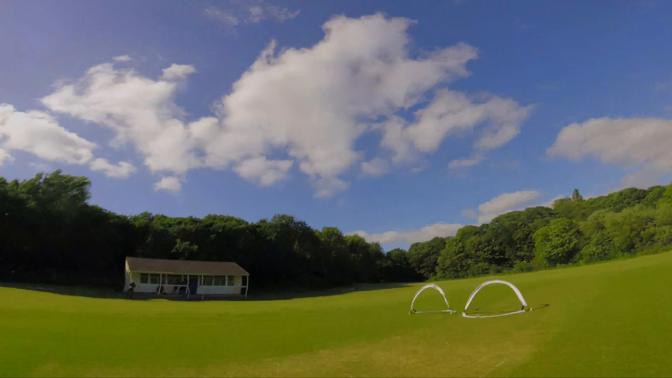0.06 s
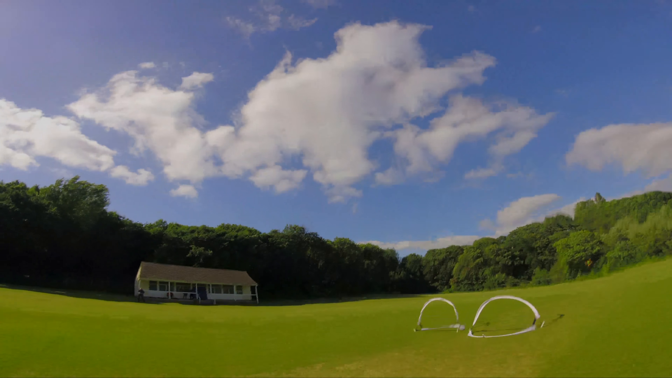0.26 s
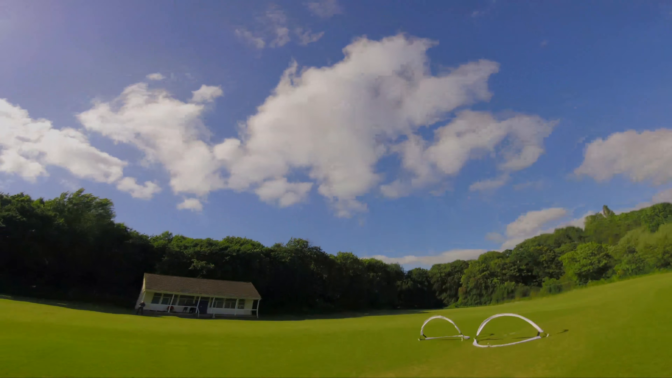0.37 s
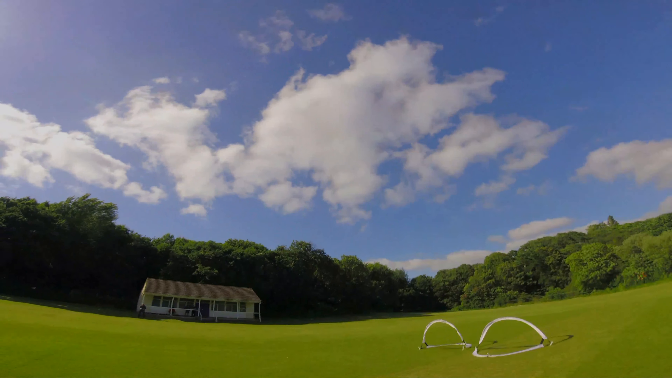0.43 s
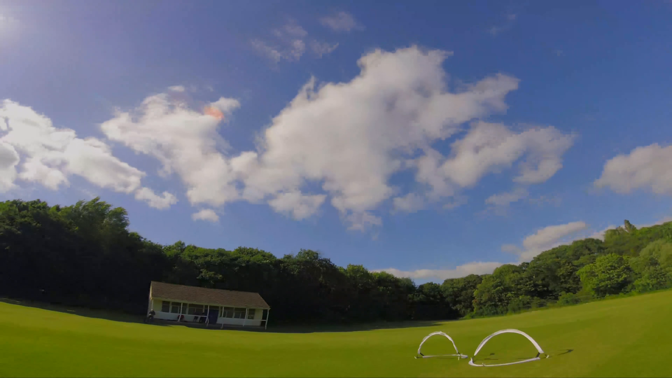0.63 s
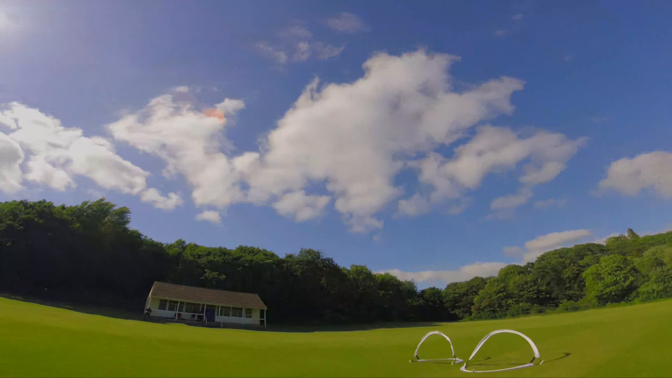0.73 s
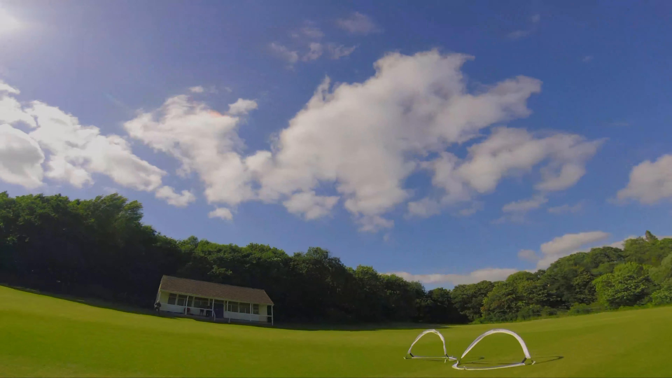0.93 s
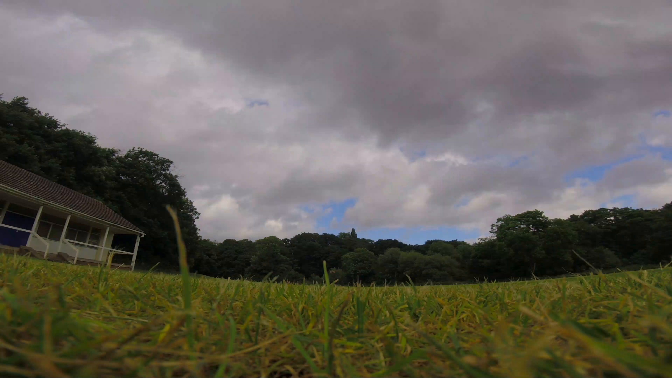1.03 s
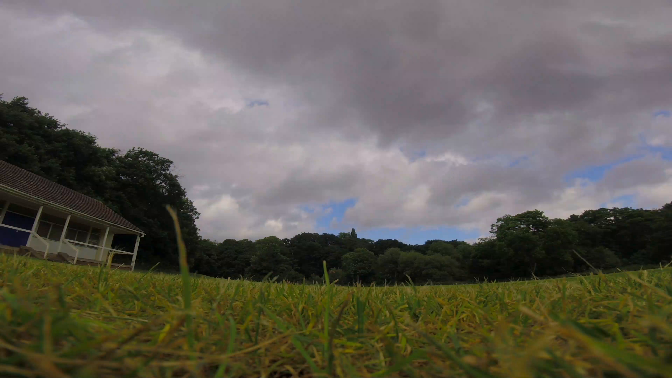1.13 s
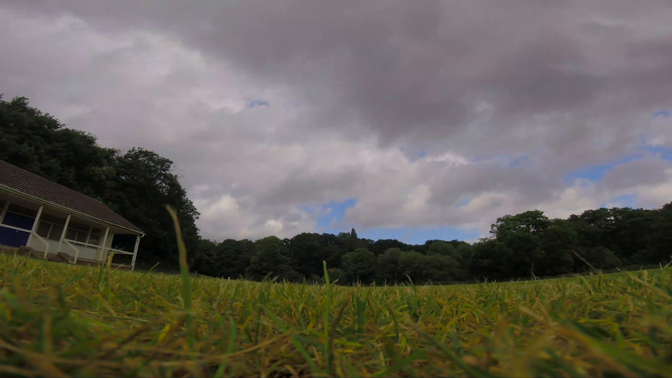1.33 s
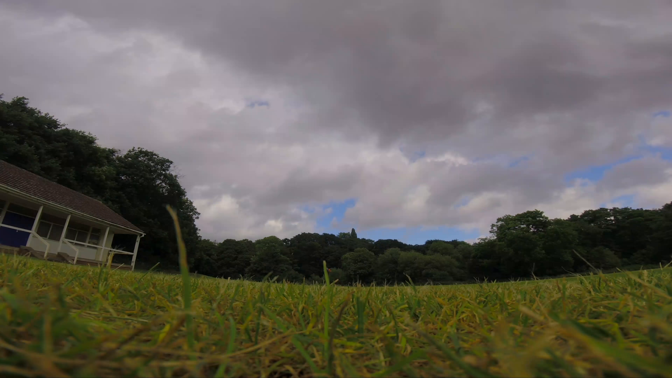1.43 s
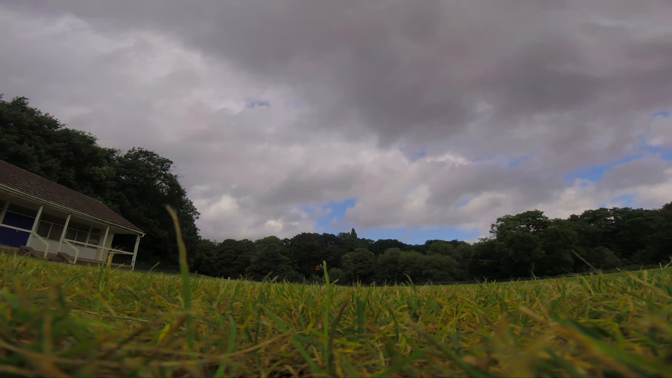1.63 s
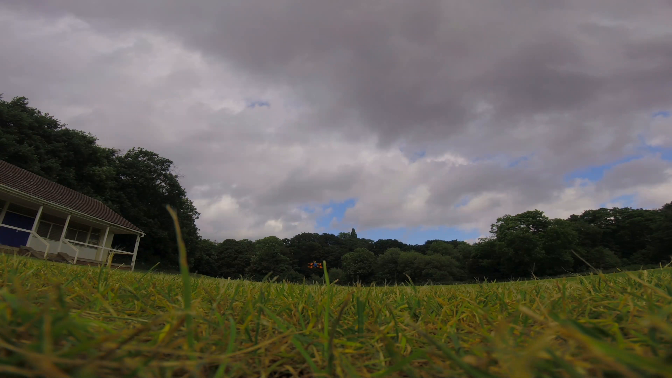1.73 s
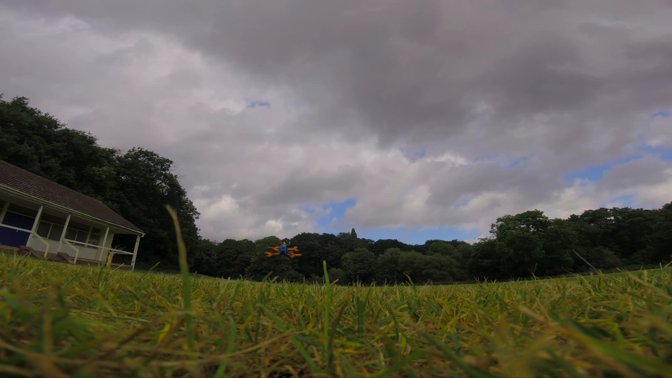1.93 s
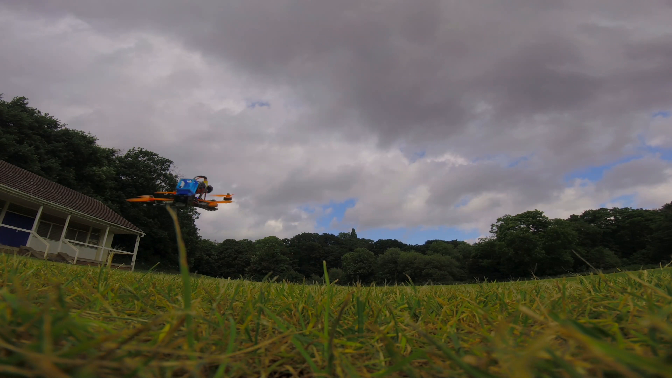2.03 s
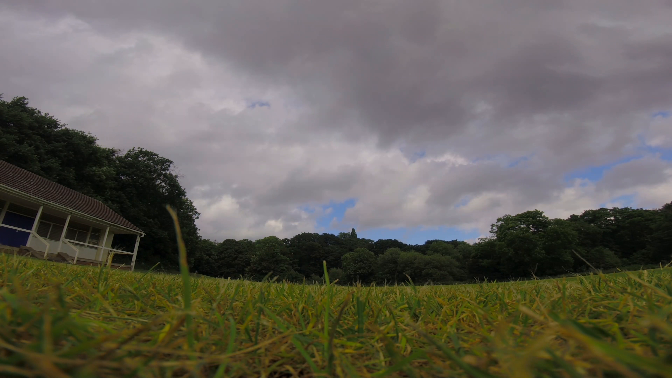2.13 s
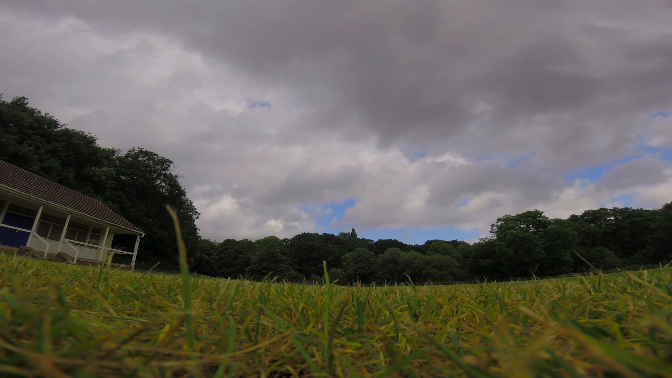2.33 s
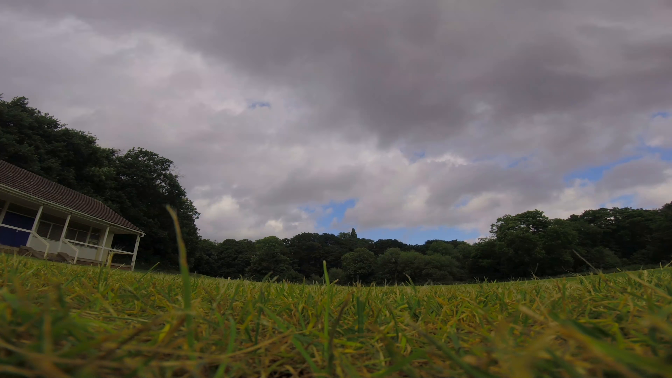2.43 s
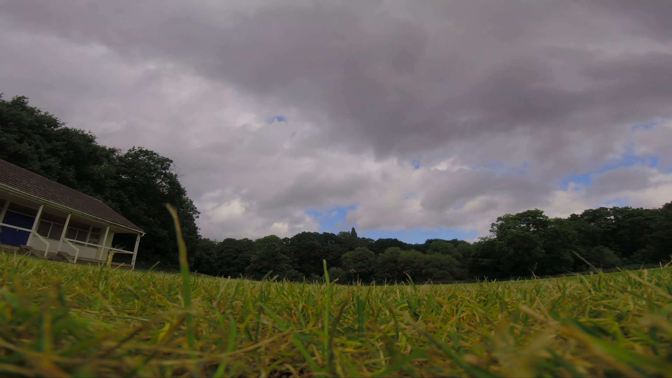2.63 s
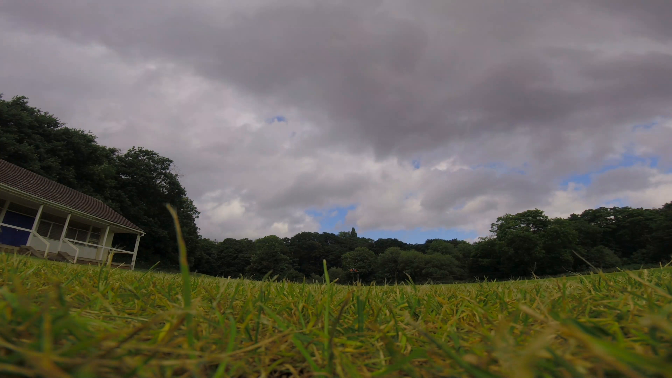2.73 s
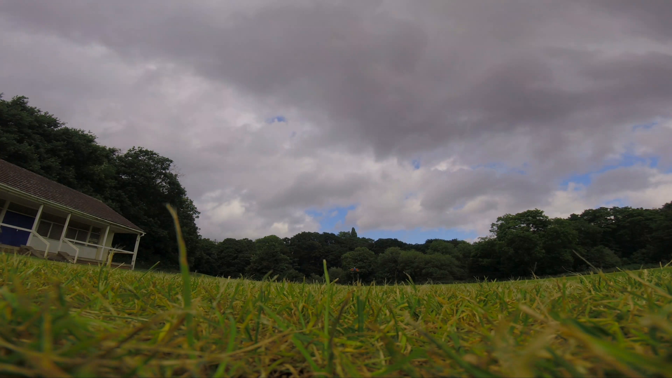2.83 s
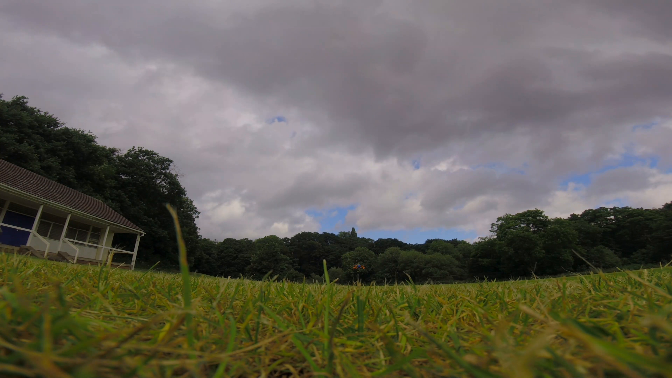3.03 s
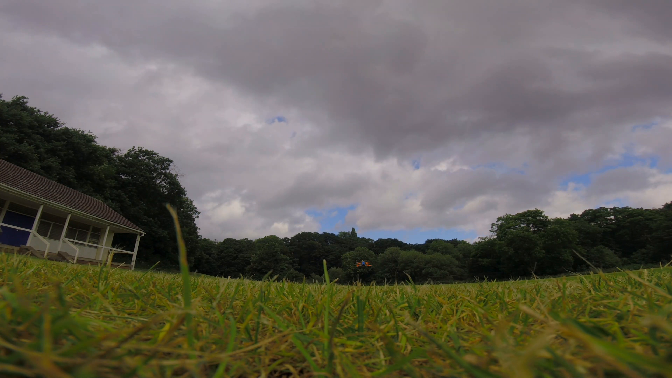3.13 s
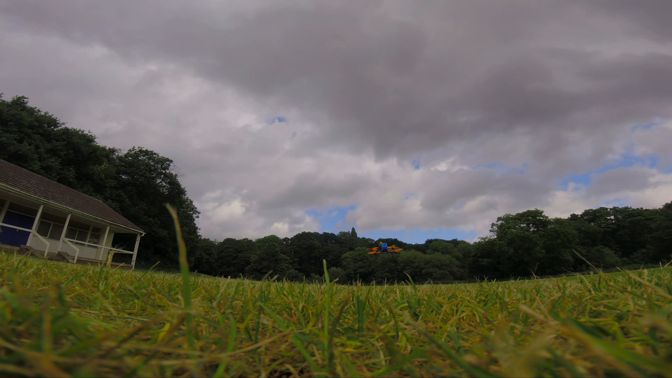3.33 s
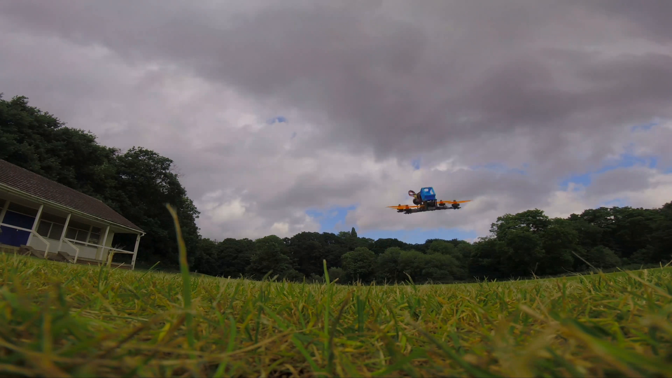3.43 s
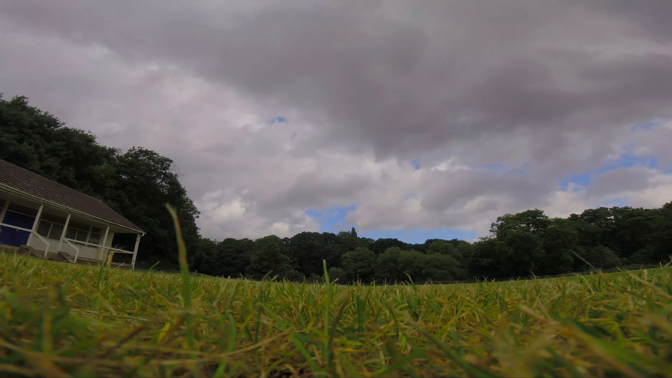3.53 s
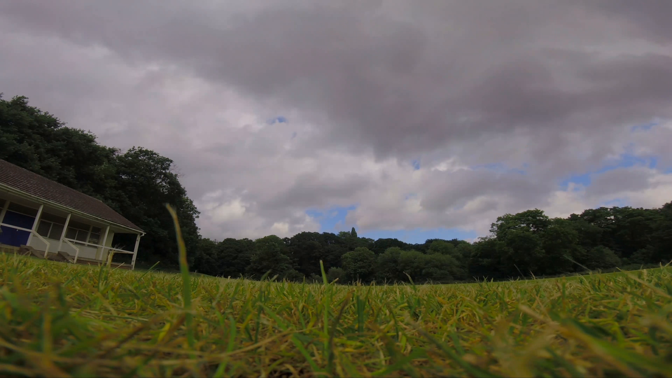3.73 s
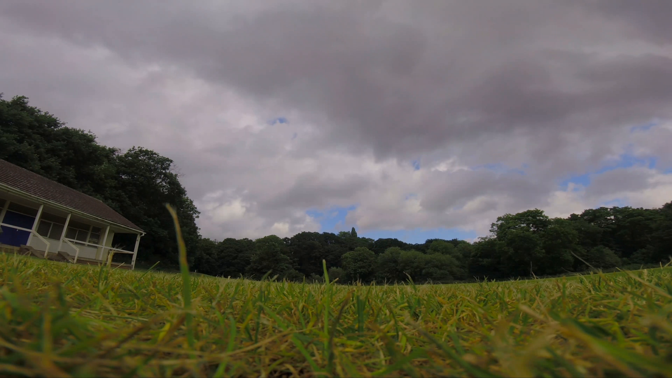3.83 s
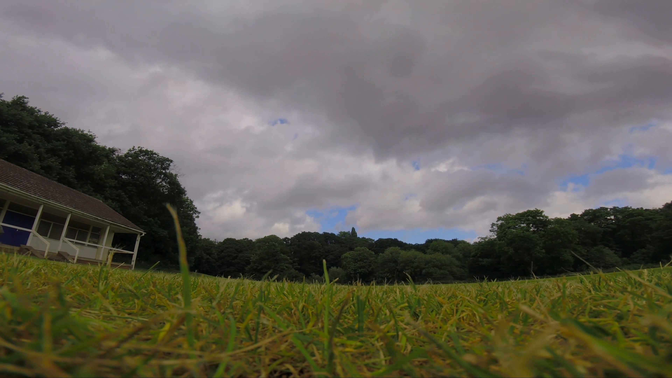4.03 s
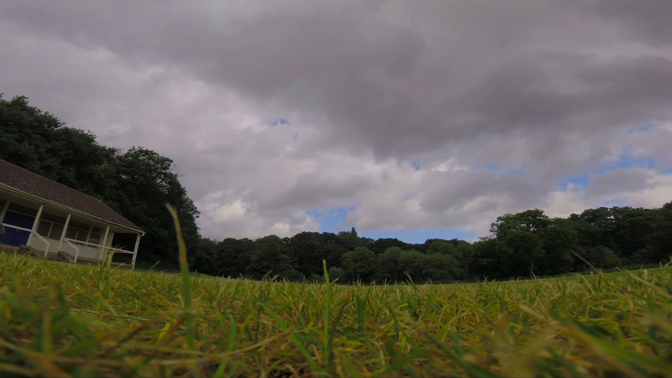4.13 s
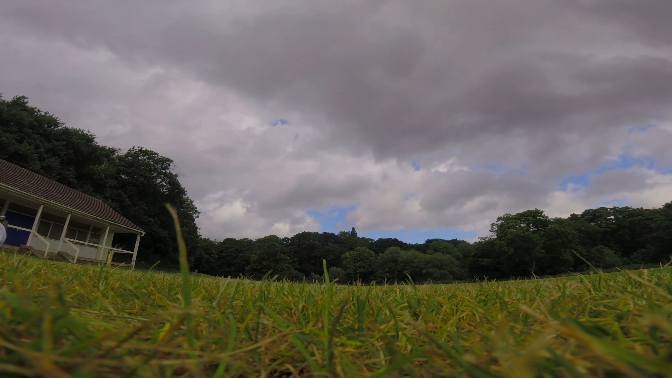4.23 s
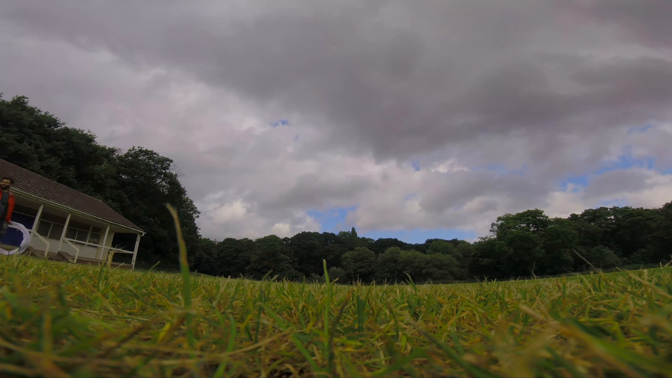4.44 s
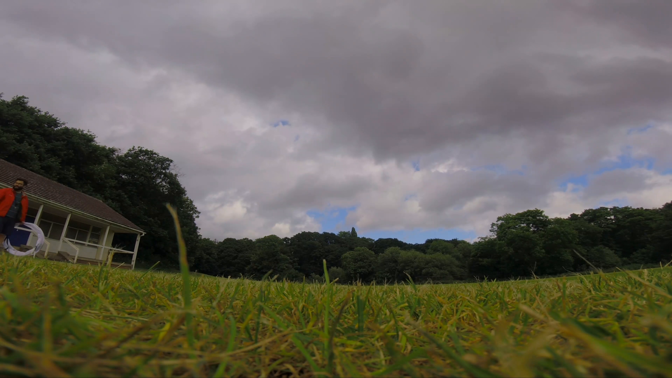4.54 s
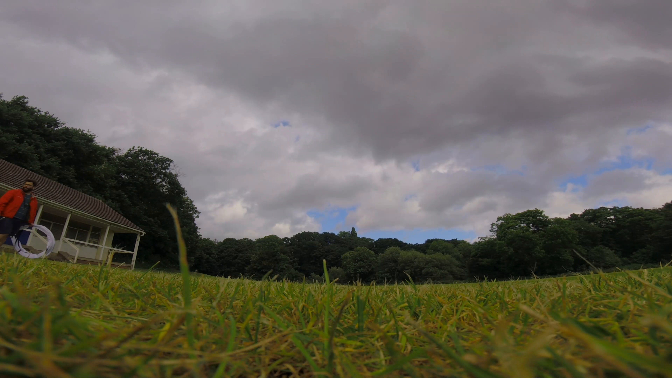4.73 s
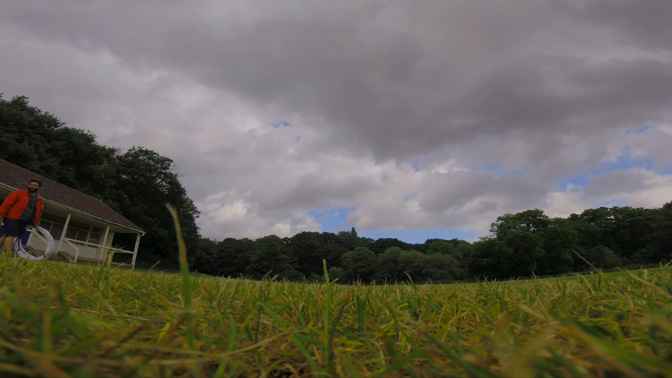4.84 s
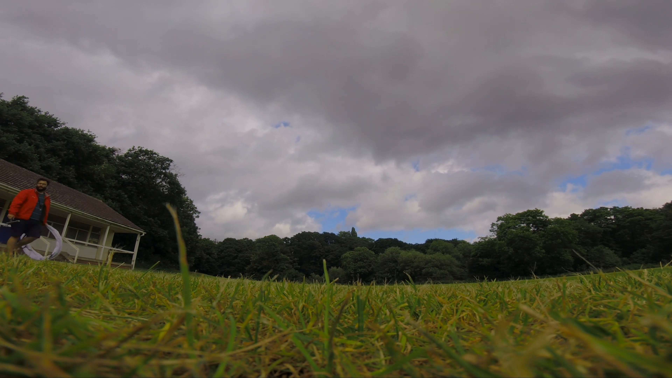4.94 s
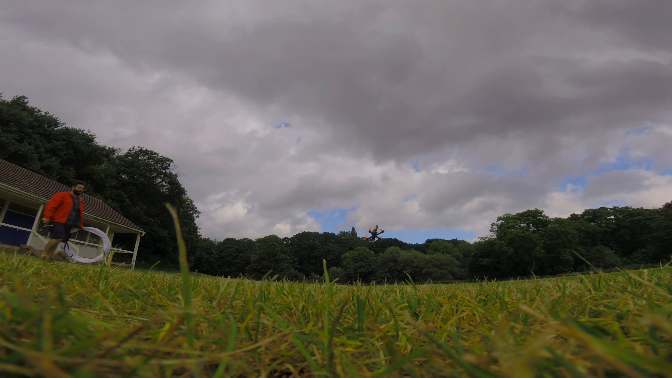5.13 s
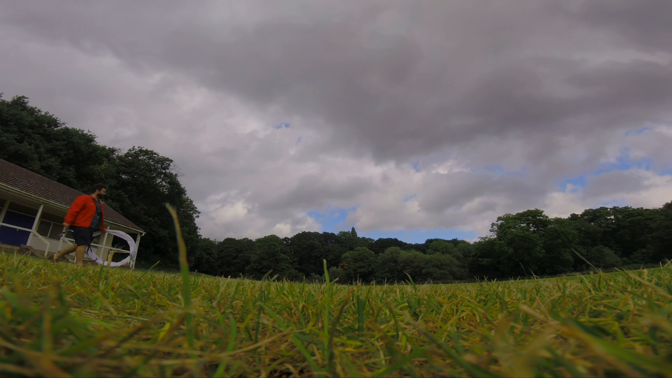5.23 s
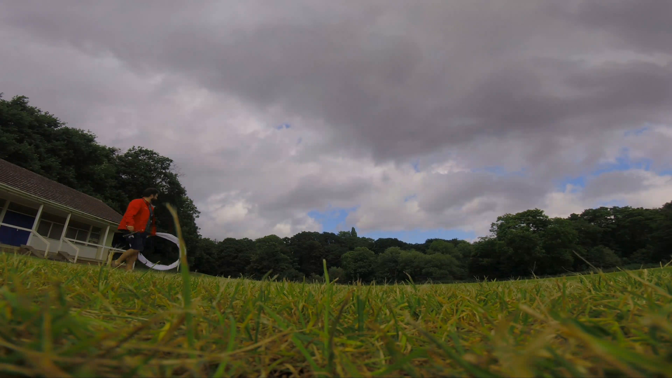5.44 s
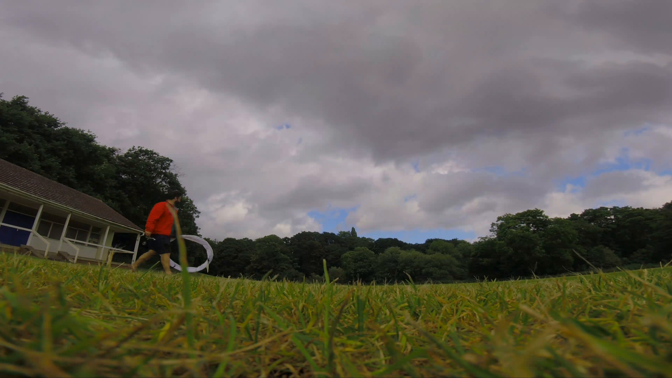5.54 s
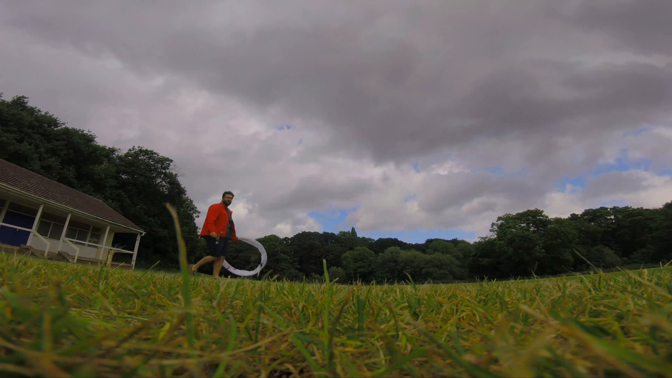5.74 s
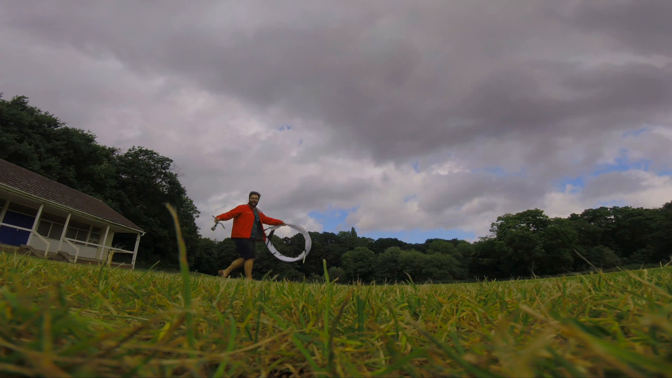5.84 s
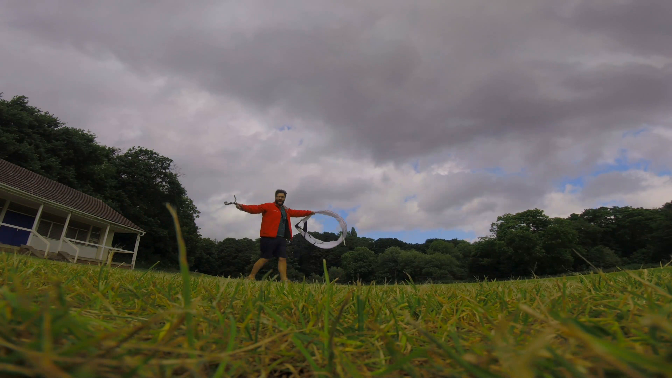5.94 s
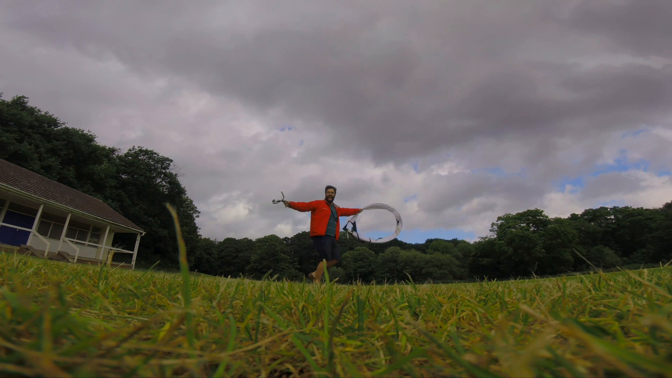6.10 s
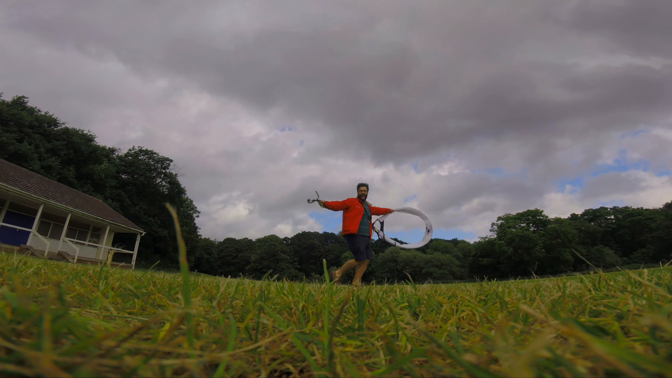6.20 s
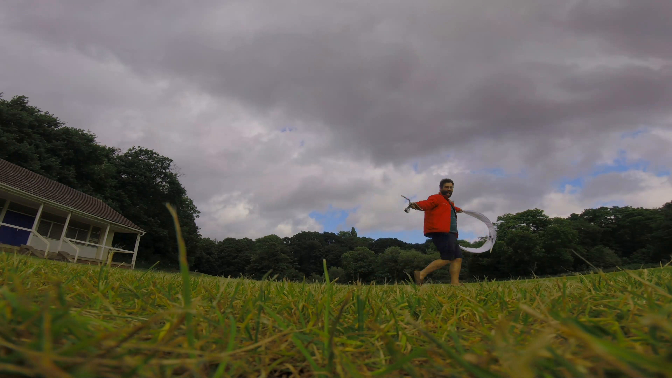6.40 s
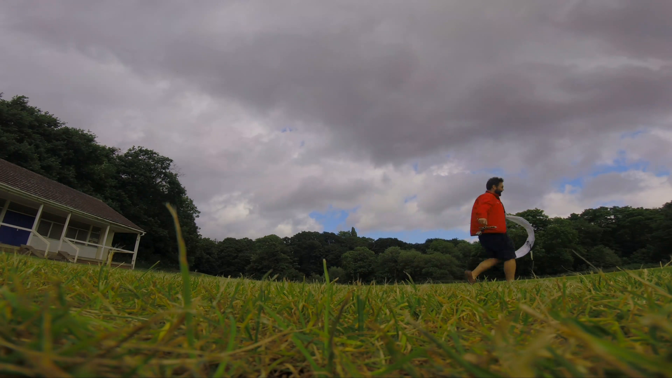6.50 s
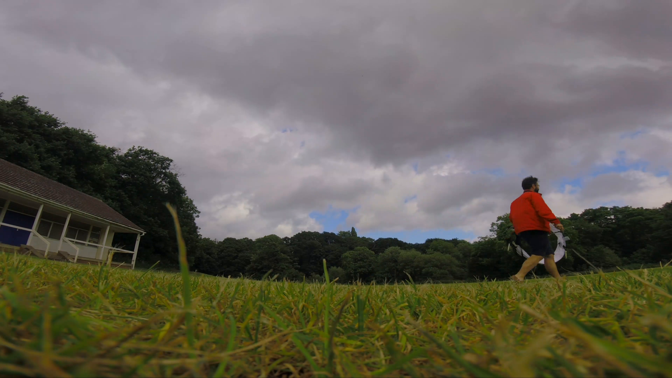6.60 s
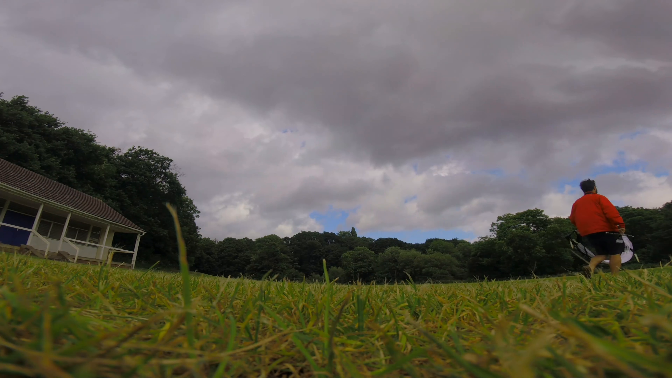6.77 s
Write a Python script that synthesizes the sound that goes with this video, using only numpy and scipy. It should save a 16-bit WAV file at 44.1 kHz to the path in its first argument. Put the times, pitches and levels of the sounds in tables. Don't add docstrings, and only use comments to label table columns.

```python
import sys
import numpy as np
from scipy import signal
from scipy.fft import rfft, irfft
from scipy.io import wavfile
from scipy.ndimage import uniform_filter1d

SR = 44100
rng = np.random.default_rng(int(sys.argv[2]) if len(sys.argv) > 2 else 0)


def unload_audio(sound):
    columns = np.transpose(np.atleast_2d(sound))
    steps = np.round(np.clip(columns, -1, 1) * 32767)
    wavfile.write(sys.argv[1], SR, steps.astype(np.int16))


def linear_from_db(decibels):
    return 10 ** (np.asarray(decibels, float) / 20)


N = 429975
T = np.arange(N) / SR

SHOT_STARTS = [0, 1.1012, 2.675, 3.8706, 7.637, 8.778, 9.76]
SHOT = np.searchsorted(SHOT_STARTS, T, side="right")

# frequency in Hz, level in dB.
FIELD_COLOUR = [(53, -32), (90, -55), (144, 1.5), (245, -4), (277, -2), (353, -9), (405, -10.5), (507, -13),
                (866, -12.5), (5600, -48), (7280, -94.5), (12300, -120)]
# frequency in Hz, level in dB.
RECORDER_COLOUR = [(5500, -14), (6300, 6.5), (8500, 5), (11000, 0), (12000, -6), (15500, -2.5)]
FIELD_DB, RECORDER_DB = -43, -65.5
# time in seconds, peak in dB, pitch in Hz, length in seconds.
FAR_TICKS = [
    (5.684, -57.5, 2480, 0.068),
    (5.865, -64, 2130, 0.087),
    (6.054, -54, 2290, 0.033),
    (6.172, -48, 1470, 0.024),
    (6.272, -64, 2750, 0.035),
    (6.454, -52, 1200, .01),
    (6.722, -62, 2360, .03),
    (7.453, -67, 2600, .02),
]

# start in seconds, hold in seconds, level in dB, rise in dB/s, fall in dB/s.
BREEZE = [
    (1.1, 1.6, -76.5, 50, 50),
    (3.85, .03, -53, 47, 50),
    (3.9, 0.1, -38.5, 400, 45),
    (4.6, 3.1, -62.5, 50, 50),
    (5.1, .01, -49, 198, 200),
    (5.35, .01, -55, 26, 47),
    (7.7, 1.1, -72, 37, 50),
    (8.95, .01, -55, 70, 64),
    (9.55, .2, -22, 440, 50),
]
# start in seconds, hold in seconds, level in dB, rise in dB/s, fall in dB/s.
DOWNWASH = [
    (3.68, .01, -21, 420, 138),
    (3.78, .1, -20.5, 67, 50),
    (8.88, 0.33, -33.5, 176, 600),
    (9.53, 0.06, -11.5, 300, 233),
    (9.7, .1, -27.5, 90, 49),
]
# time in seconds, peak in dB, pitch in Hz.
EDDIES = [(3.697, -5.5, 210), (3.793, -8.5, 178), (3.808, -14, 263), (3.85, -11, 208), (3.8651, -7, 240),
          (5.283, -30, 151), (5.319, -21.5, 142), (5.332, -17.5, 167), (8.98, -18, 156),
          (9.038, -18.5, 181), (9.509, -1, 253), (9.551, -7.5, 185.3), (9.579, 0.5, 146.6)]

# time in seconds, shaft speed in Hz.
SHAFT = [(0, 271.8), (.12, 266.3), (.22, 253.7), (.3, 238.2), (.38, 204.7), (.45, 176.7), (.52, 165.3),
         (.62, 168.6), (1.1, 166.1)]
SHAFT_IDLE_HZ, SHAFT_FULL_HZ = 167, 262
HUNT_HZ, HUNT_RATE_HZ, HUNT_S, HUNT_FADE_S = 5, 10.3, .478, .22
# level at idle in dB, level at full throttle in dB.
SHAKE = [
    (-5, -10),
    (-22.5, -16.5),
    (-23, -15.5),
    (-38, -23.5),
    (-47.5, -41),
    (-38, -26.5),
]
# frequency in Hz, level in dB.
FRAME = [(600, 6.5), (900, 8), (1300, -5.5), (1600, -5.5), (2100, -8.5), (2400, -34), (4000, -65)]
# centre in Hz, width in Hz, level in dB.
HOUSING = [(5250, 850, 4.5), (6430, 2700, 6.5), (9400, 2000, -2.5), (1500, 430, 12.5), (400, 430, 25)]

# closest moment in seconds,
# reach coming in seconds, reach going in seconds, hiss in dB, treble in dB.
PASSES = [
    (2.128, 0.052, .055, -20, -14.5),
    (3.551, 0.043, 0.066, -17, -18),
    (4.05, 0.059, 0.039, -48, -11),
    (4.46, .04, .08, -71, -43),
    (5.1, 0.018, 0.021, -15.5, -16.5),
    (8.178, 0.075, 0.07, -17, -19.5),
    (8.8, .12, 0.16, -45, -8),
    (9.386, 0.047, 0.041, -15.5, -18),
]
OVERHEAD_DB = -30
# overtones coming in dB, overtones going in dB, lowest pitch
# the turf cancels in Hz, width of that dip in reaches, whine lost per tenfold distance in dB.
ATTITUDE = [(-7.5, -6, 2780, 2.2, 23), (-10, -6.5, 2130, 2.1, 22.5), (-6.5, -4, 5300, 1.7, 12),
            (-7, -10, 4600, 1.7, 20), (-17, 0, 1980, 1.65, 31.5), (-8, -3, 1930, 2.97, 25.5),
            (-13, -20, 4700, 1.73, 22), (-9.5, -7, 1850, 2.05, 22)]

# frequency in Hz, level in dB.
HISS_COLOUR = [(100, -78), (140, 10.5), (250, 6), (600, 4), (1200, 9), (2200, 4.5), (4000, 0.5), (5800, -1),
               (6700, -5.5), (8000, -5), (11000, -6.5), (12000, -19.5), (13200, -13), (15500, -30.5)]
HISS_FALL_DB, HISS_SPEED_DB = 29.5, 24.5
FAR_TREBLE_DB = 3.5
DRONE_GONE_S = 5.55
TURF_FAR_HZ = 5820
TURF_LAG = 0.32

# multiple, level in dB.
BLADE = [(1 / 3, -12), (2 / 3, -21.5), (1, 0), (2, 0), (3, -9), (4, -16), (5, -21.5)]
# time in seconds, then each audible rotor's blade rate in Hz.
EARLY = [
    [(1.1, 643.5, 590.5, 592), (1.89, 647.7, 593, 594), (1.93, 691, 630, 631), (2.0, 752, 670.6, 669),
     (2.07, 755, 672, 685), (2.16, 704, 633, 654), (2.24, 687, 620, 642), (2.55, 702, 582, 658),
     (2.68, 708.5, 608, 640)],
    [(2.68, 587, 539, 518, 523.5), (3.23, 590, 552, 524, 518.7), (3.3, 636, 570, 569, 485.5),
     (3.37, 700, 621, 605, 439), (3.5, 710, 659, 601, 395.6), (3.56, 682, 658, 585, 387),
     (3.63, 652, 588, 556, 329), (3.76, 616, 551, 523, 300), (3.87, 546, 502, 484, 283)],
]
# time in seconds, then each audible rotor's blade rate in Hz.
MIDDLE = [
    [(3.96, 640, 418), (4.04, 890, 603), (4.08, 885, 747), (4.18, 750, 708)],
    [(4.38, 555), (4.43, 717), (4.49, 780), (4.54, 704)],
    [(4.8, 541, 540.4), (4.9, 737, 615), (4.98, 624, 532.4), (5.03, 625, 521), (5.09, 815, 675.5),
     (5.13, 738, 650), (5.2, 524, 520), (5.3, 637, 573), (5.45, 624, 580)],
]
# time in seconds, then each audible rotor's blade rate in Hz.
LATE = [
    [(7.637, 472, 412.7, 380), (7.78, 434, 393, 343), (7.89, 438, 400, 341.5), (7.99, 556.7, 480.8, 459),
     (8.04, 582, 516.6, 477), (8.15, 574, 496.6, 507), (8.25, 537, 453, 595), (8.4, 446.6, 400, 555),
     (8.55, 344, 350, 520)],
    [(8.47, 546, 484), (8.58, 588, 496), (8.7, 655, 463), (8.78, 591, 478)],
    [(8.78, 558, 511, 515, 562), (8.92, 553, 515.7, 517, 553), (9.1, 611.3, 556.2, 519, 612.3),
     (9.29, 610.7, 551, 522, 614.8), (9.35, 654, 592.5, 561, 655.3), (9.4, 691.3, 611, 586, 660),
     (9.46, 717, 626.4, 606, 696), (9.63, 717, 630.5, 655, 739), (9.75, 646, 578, 620, 634)],
]
SPEEDS = EARLY + MIDDLE + LATE
# level coming in dB, level going in dB.
WHINE_DB = [
    [(-21, -18.5), (-24, -25), (-19, -25)],
    [(-18, -22), (-17, -21), (-18, -23), (-31, -49)],
    [(-56, -46), (-39, -53)],
    [(-48, -52)],
    [(-11.5, -15.5), (-12.5, -19.5)],
    [(-22.5, -24), (-22, -33.5), (-26, -24)],
    [(-39, -35), (-45, -49)],
    [(-19, -22.5), (-17.5, -18), (-19.5, -24.5), (-24, -22.5)],
]
WHINE_LEAD = 0.5
WHINE_SPEED_DB, OVERTONE_SPEED_DB = 5.5, 11.5
FLARE_DB, FLARE_AT, FLARE_WIDE = 7.5, 1.15, 1.3
THIRD_DB, THIRD_AT = 6, -0.7


def unit(x):
    return x / np.sqrt(np.mean(x ** 2))


def noise(points):
    hz, db = np.transpose(points)
    f = np.maximum(np.fft.rfftfreq(N, 1 / SR), 1)
    db = np.interp(np.log(f), np.log(hz), db, left=-80, right=-80)
    return unit(irfft(rfft(rng.standard_normal(N)) * linear_from_db(db), N))


def band(x, hz, width):
    return signal.lfilter(*signal.iirpeak(min(hz, .45 * SR), hz / width, fs=SR), x)


def filtered(x, order, hz, kind="low"):
    return signal.sosfiltfilt(signal.butter(order, hz, kind, fs=SR, output="sos"), x)


def walk(rate, size=N):
    k = max(int(SR / rate), 2)
    steps = np.repeat(rng.standard_normal(size // k + 1), k)
    return 1.39 * uniform_filter1d(uniform_filter1d(steps, k), k)[:size]


def shot(s):
    return SHOT == np.searchsorted(SHOT_STARTS, s, side="right")


def reaches(t, closest, coming, going):
    return (t - closest) / np.where(t < closest, coming, going)


def gusts(rows):
    swells = []
    for s, hold, db, rise, fall in rows:
        slope_db = rise * np.maximum(s - T, 0) + fall * np.maximum(T - s - hold, 0)
        swells.append(shot(s + .002) * linear_from_db(db - slope_db))
    return np.max(swells, axis=0)


def field():
    hum = noise(FIELD_COLOUR)
    low = filtered(hum, 2, 500)
    out = linear_from_db(FIELD_DB) * (low * linear_from_db(0.58 * walk(8.6)) + (hum - low) * linear_from_db(0.43 * walk(2.74)))
    out += linear_from_db(RECORDER_DB) * noise(RECORDER_COLOUR)
    for s, db, hz, length in FAR_TICKS:
        tick = unit(band(band(rng.standard_normal(N), hz, hz * 0.15), hz, hz * 0.13))
        out += linear_from_db(db - 1.5) * np.exp(-((T - s) / length * 2) ** 2) * tick
    return out * (SHOT > 1)


def wind():
    rumble = noise([(15, -1), (40, -2.5), (80, -4), (140, -6), (300, -17)])
    out = gusts(BREEZE) * linear_from_db(2 * walk(5.8)) * rumble
    ringing = noise([(80, -46), (125, -10), (180, 7), (280, -10), (500, -18), (900, -60)])
    ringing = ringing * linear_from_db(5.3 * walk(45))
    out += gusts(DOWNWASH) * 1.97 * np.tanh(ringing / 2.1)
    thumps = np.zeros(N)
    for s, db, hz in EDDIES:
        t = (T - s - .006) * hz
        swing = np.cos(2 * np.pi * t) + .2 * np.cos(5 * np.pi * t)
        thumps -= shot(s) * linear_from_db(db) * np.exp(-(t / .8) ** 2) * swing
    return out + filtered(thumps, 2, 95, "high")


def aboard():
    n = int(SHOT_STARTS[1] * SR)
    hz = np.interp(T[:n], *np.transpose(SHAFT))
    since = np.maximum(T[:n] - HUNT_S, 0)
    hz = hz + HUNT_HZ * np.exp(-since / HUNT_FADE_S) * np.sin(2 * np.pi * HUNT_RATE_HZ * since)
    throttle = np.clip((hz - SHAFT_IDLE_HZ) / (SHAFT_FULL_HZ - SHAFT_IDLE_HZ), 0, 1) ** 1.1
    db1, db2, db3, upper_db, hiss_db, air_db = (idle + (full - idle) * throttle for idle, full in SHAKE)
    unsteady_hz = uniform_filter1d(hz, size=900) * (1 + 0.0039 * walk(40, size=n))
    turn = 2 * np.pi * np.cumsum(unsteady_hz) / SR
    turn = turn - turn[-1] - np.pi / 9

    low = 0
    for k, db, lag in ((1, db1, 0), (2, db2, 3.3), (3, db3, .2)):
        db = db + (k - 0.2) * 1.15 * walk(22, size=n) + 1.6 * throttle * walk(70, size=n)
        low = low + linear_from_db(db) * np.sqrt(2) * np.sin(k * turn + lag)

    other = turn * .98 + 1.51 * walk(9, size=n)
    upper = 0
    for k in range(4, 15):
        frame_db = np.interp(k * hz, *np.transpose(FRAME)) + 2.5 * walk(18.2, size=n) + 1.6 * (k % 2)
        own = np.sin(k * turn + 0.28 * k * walk(45, size=n))
        neighbour = linear_from_db(-1.5 + 2.4 * walk(6.5, size=n)) * np.sin(k * other)
        upper = upper + linear_from_db(frame_db) * (own + neighbour)

    rattle = 0
    for k in range(1, 6):
        gain = linear_from_db(-44.5 - 3.1 * k + 5.6 * walk(25, size=n))
        rattle = rattle + gain * np.sin((k + .5) * turn + 2.3 * walk(30, size=n))

    beat = 1 + .4 * np.cos(turn + 1.8) + 0.42 * np.cos(2 * turn)
    hiss = sum(linear_from_db(db) * unit(band(band(rng.standard_normal(n), f, w), f, w)) for f, w, db in HOUSING)
    air = noise([(18, -22.5), (60, -8), (120, -8.5), (200, -6.5), (700, -36)])[:n]
    air = air * linear_from_db(2.6 * walk(28, size=n))
    shaken = low + rattle + linear_from_db(upper_db - 3) * upper
    rushing = linear_from_db(hiss_db - 10) * beat * hiss + linear_from_db(air_db + 2.5) * air
    return np.pad(shaken + rushing, (0, N - n))


def hiss_reach():
    level, treble = 1e-9, 0
    for (closest, coming, going, db, treble_db), rows in zip(PASSES, SPEEDS):
        s, *speeds = np.transpose(rows)
        speed = np.mean(speeds[:3], axis=0)
        far = np.hypot(1, reaches(T, closest, coming, going))
        faster = np.log2(np.interp(T, s, speed) / np.interp(closest, s, speed))
        gain = shot(s.mean()) * linear_from_db(db - HISS_FALL_DB * np.log10(far) + HISS_SPEED_DB * faster)
        level = level + gain
        treble = treble + gain * (treble_db + FAR_TREBLE_DB * (1 - 1 / far))
    gone = shot(DRONE_GONE_S) * np.clip((T - DRONE_GONE_S) / .3, 0, 1)
    return level * (1 - gone), treble / level


def blade_hiss(level, treble_db):
    body = noise(HISS_COLOUR)
    top = filtered(body, 3, 6700, "high")
    low = filtered(body, 3, 2100)
    body = body + low * (np.clip(level / linear_from_db(-49), .3, 30) ** -.2 - 1)
    chop = linear_from_db(0.43 * walk(300) + 0.53 * walk(25) + 0.37 * walk(7))
    return linear_from_db(1.5) * level * (body - top + linear_from_db(treble_db + 7) * top) * chop


def turf(direct):
    dip = 0
    for (s, coming, going, _, _), (_, _, low_hz, wide, _) in zip(PASSES, ATTITUDE):
        way = reaches(T, s, coming, going) - TURF_LAG
        dip = dip + (TURF_FAR_HZ - low_hz) / (1 + (way / wide) ** 2)
    notch_hz = np.maximum(TURF_FAR_HZ - dip, 1200)
    echo = np.interp(T - .5 / notch_hz, T, direct)
    echo = signal.lfilter([.3, .4, .3], 1, np.roll(echo, -1))
    share = np.clip(1.15 - notch_hz / 5500, 0, .9)
    return (direct + share * echo) / np.sqrt(1 + share ** 2)


def rotors():
    out = np.zeros(N)
    for number, (flight, rows, whine, attitude) in enumerate(zip(PASSES, SPEEDS, WHINE_DB, ATTITUDE)):
        closest, coming, going, hiss_db, _ = flight
        coming_db, going_db, _, _, fall_db = attitude
        s, *speeds = np.transpose(rows)
        blip = number == 2
        overhead = hiss_db > OVERHEAD_DB
        i = np.flatnonzero((T > s[0] - .03) & (T < s[-1] + .03) & shot(s.mean()))
        way = reaches(T[i], closest, coming, going)
        far = np.hypot(1, way + WHINE_LEAD)
        past = .5 + .5 * (way + WHINE_LEAD) / far
        flare_db = overhead * FLARE_DB * np.exp(-((way - FLARE_AT) / FLARE_WIDE) ** 2)
        overtone_db = np.where(way < FLARE_AT, coming_db, going_db) + flare_db
        overtone_db = uniform_filter1d(overtone_db, size=2000)
        third_db = overhead * THIRD_DB * np.exp(-(way - THIRD_AT) ** 2)
        fade = np.clip(1 + np.minimum(T[i] - s[0], s[-1] - T[i]) / 0.006, 0, 1)
        for rotor, (speed, (front_db, back_db)) in enumerate(zip(speeds, whine)):
            hz = uniform_filter1d(np.interp(T[i], s, speed), size=900, mode="nearest")
            drift = 0.00453 * walk(45.24, size=len(i))
            flutter = (0.0477 * blip + 0.01185 / far ** 2) * walk(160, size=len(i))
            phase = 2 * np.pi * np.cumsum(hz * (1 + drift + flutter)) / SR
            faster = np.log2(hz / np.interp(closest, s, speed))
            db = front_db + (back_db - front_db) * past - fall_db * np.log10(far) + WHINE_SPEED_DB * faster
            thud_db = 0.25 * (db + 39.5) - 2.2 * np.maximum(db + 19.5, 0)
            tone = 0
            for k, k_db in BLADE:
                gain_db = k_db + (1.16 + .3 * k) * walk(28.17, size=len(i))
                if k > 1:
                    gain_db = gain_db + overtone_db + OVERTONE_SPEED_DB * faster
                if k == 2 and blip and rotor == 0:
                    gain_db = gain_db + 11
                if k == 3:
                    gain_db = gain_db + third_db
                if k < 1:
                    gain_db = gain_db + thud_db
                tone = tone + linear_from_db(gain_db) * np.sin(k * phase + 2 * np.pi * rng.random())
            out[i] += np.sqrt(2) * linear_from_db(db) * fade * tone
    low_cut = signal.butter(5, 135, "high", fs=SR, output="sos")
    return signal.sosfilt(low_cut, out)


def scene():
    hiss = turf(blade_hiss(*hiss_reach()))
    return (field() + wind() + aboard() + hiss + rotors())[None]


def roll_off(x):
    return signal.sosfilt(signal.butter(12, 15740, fs=SR, output="sos"), x)


def record(dry):
    mix = np.tanh(0.59 * dry) / 0.61
    return roll_off(mix)


dry = scene()
out = record(dry)
unload_audio(out)
```